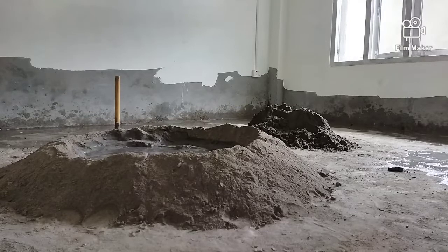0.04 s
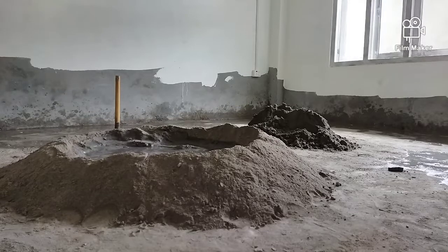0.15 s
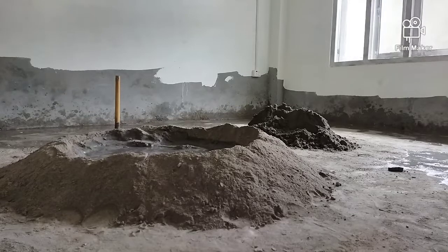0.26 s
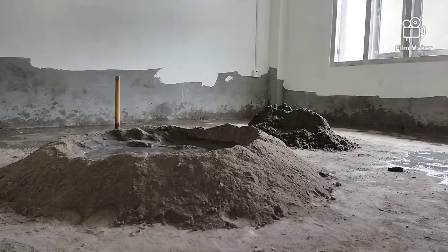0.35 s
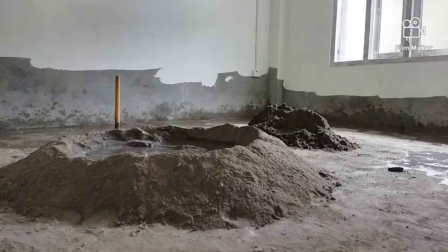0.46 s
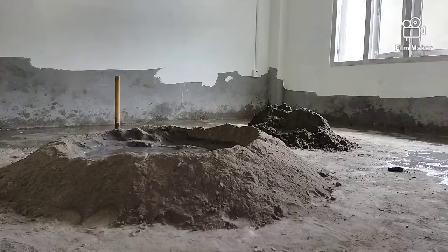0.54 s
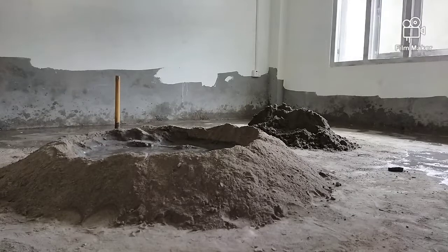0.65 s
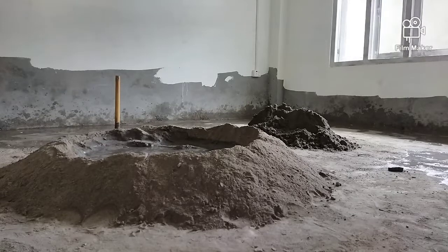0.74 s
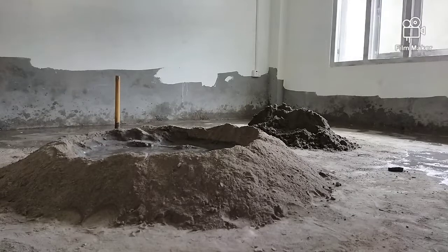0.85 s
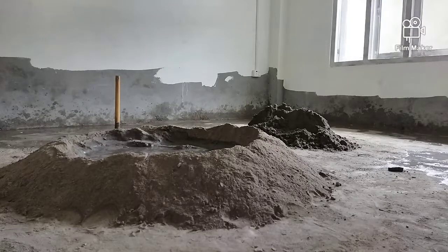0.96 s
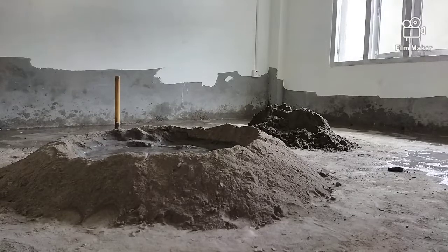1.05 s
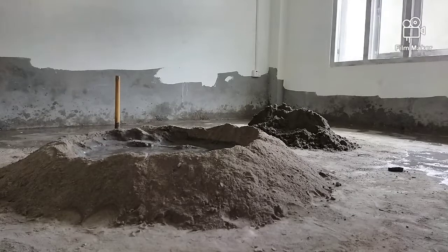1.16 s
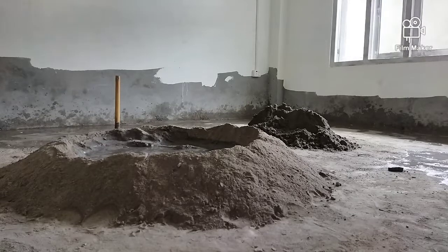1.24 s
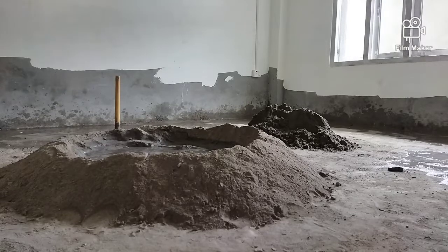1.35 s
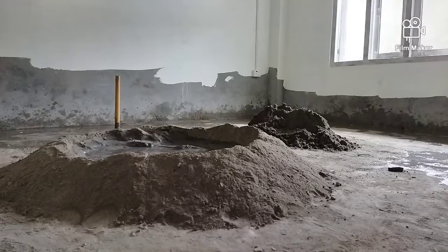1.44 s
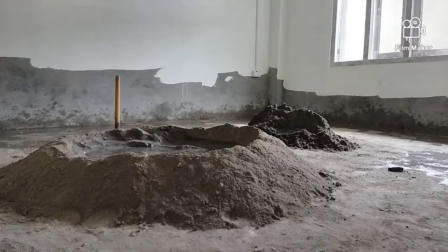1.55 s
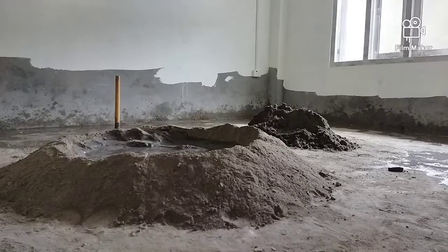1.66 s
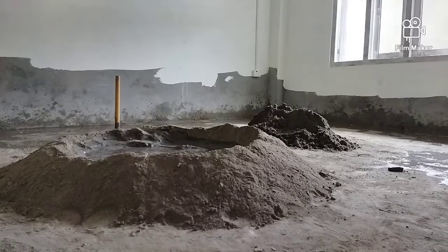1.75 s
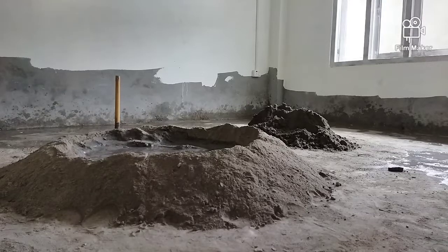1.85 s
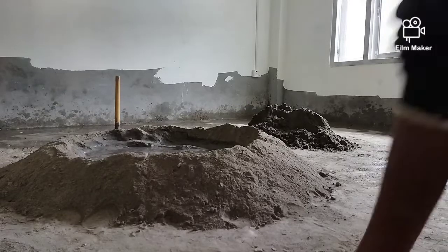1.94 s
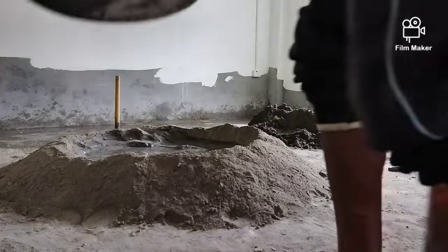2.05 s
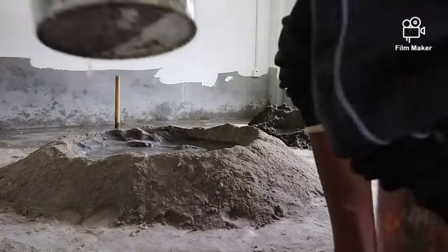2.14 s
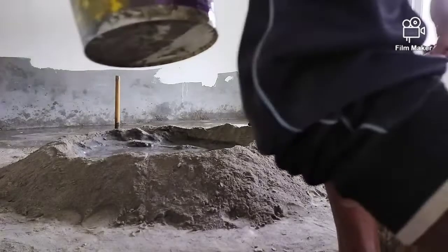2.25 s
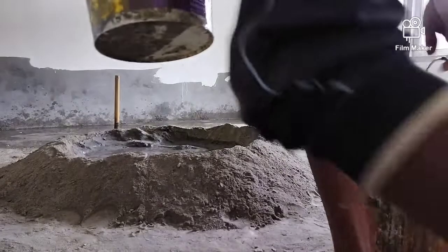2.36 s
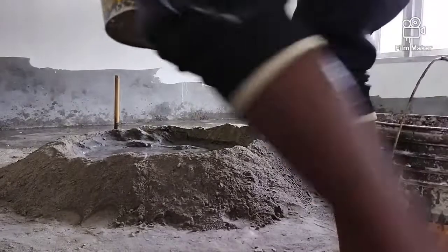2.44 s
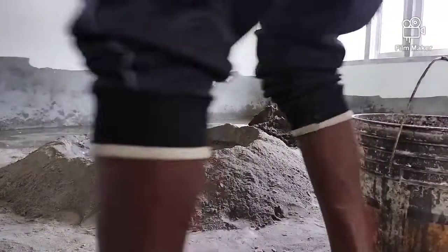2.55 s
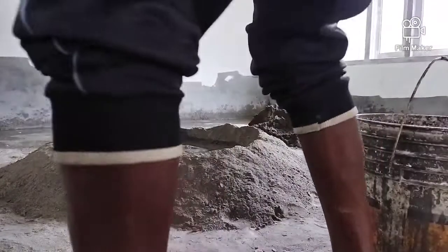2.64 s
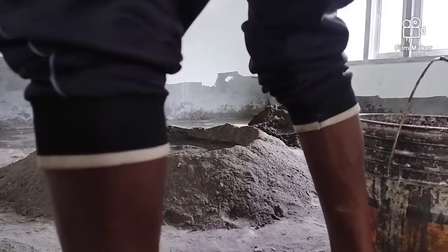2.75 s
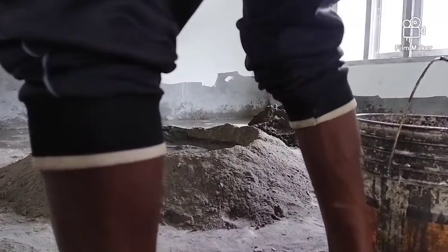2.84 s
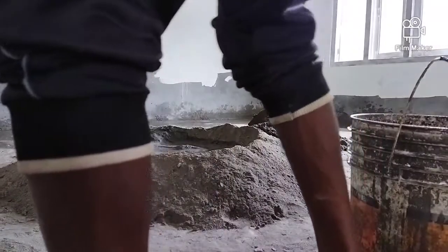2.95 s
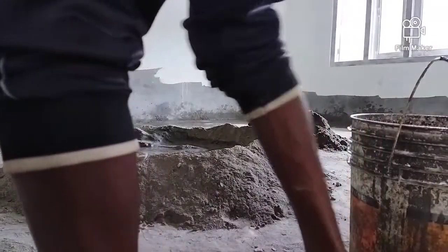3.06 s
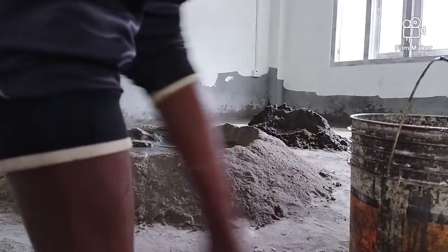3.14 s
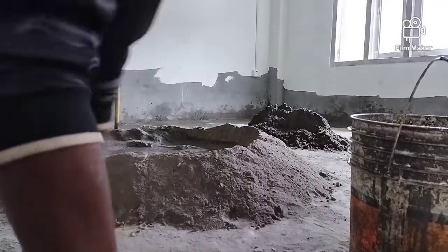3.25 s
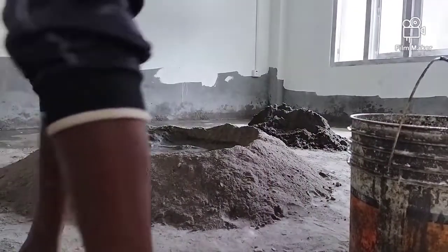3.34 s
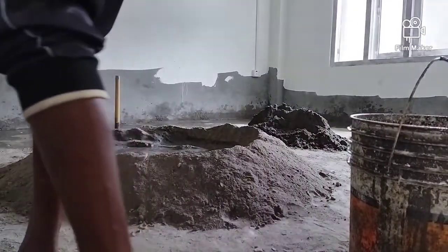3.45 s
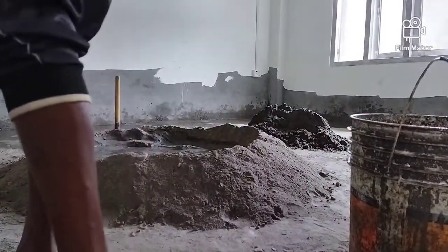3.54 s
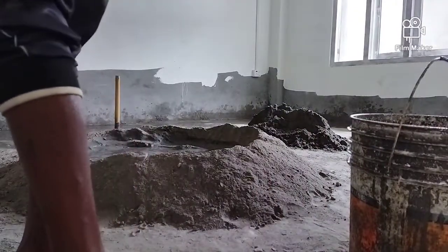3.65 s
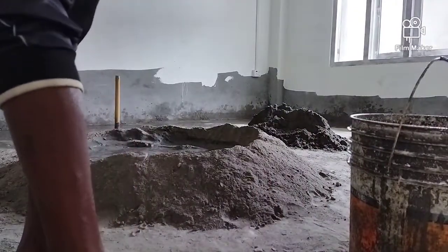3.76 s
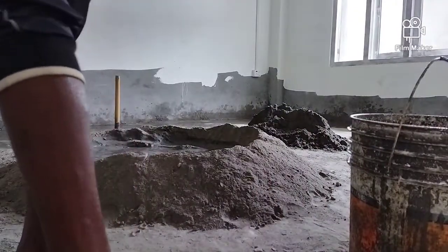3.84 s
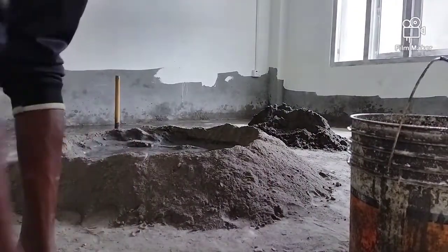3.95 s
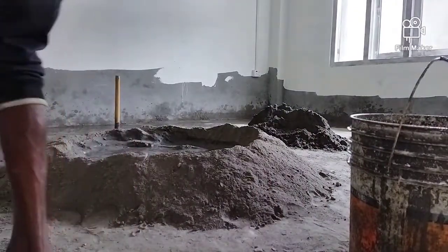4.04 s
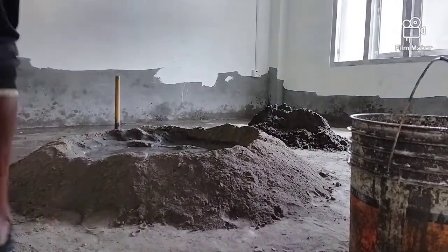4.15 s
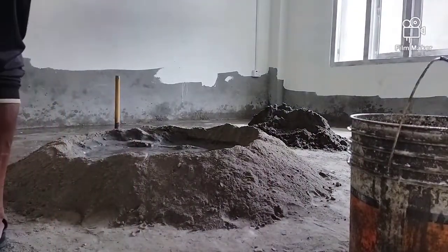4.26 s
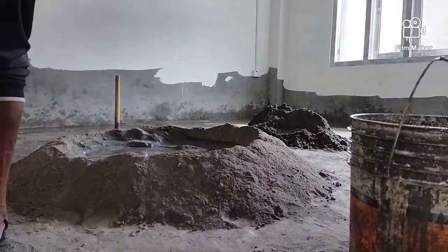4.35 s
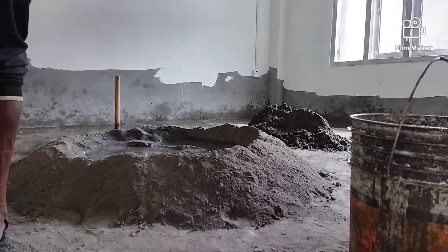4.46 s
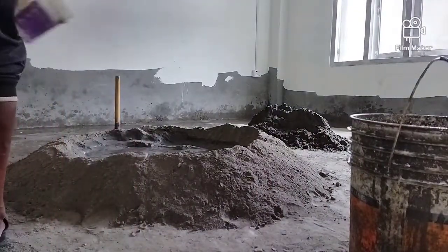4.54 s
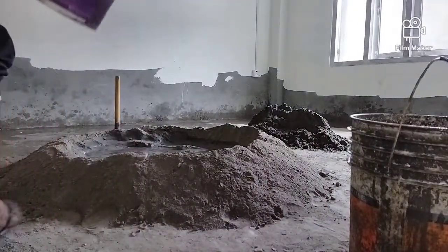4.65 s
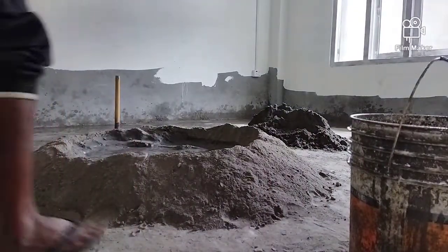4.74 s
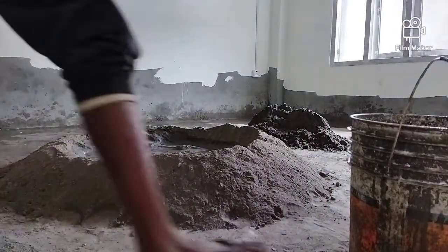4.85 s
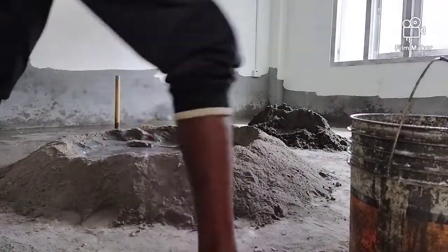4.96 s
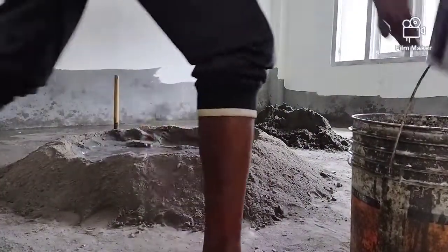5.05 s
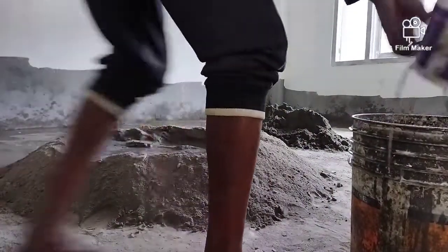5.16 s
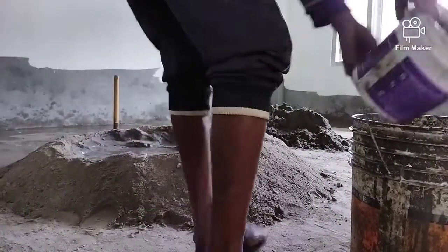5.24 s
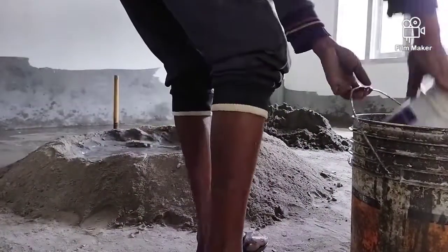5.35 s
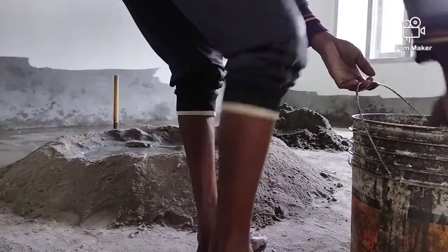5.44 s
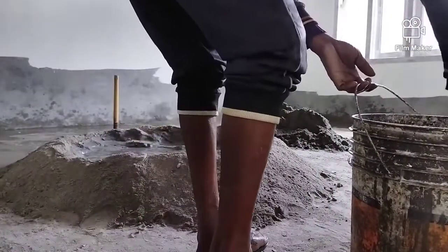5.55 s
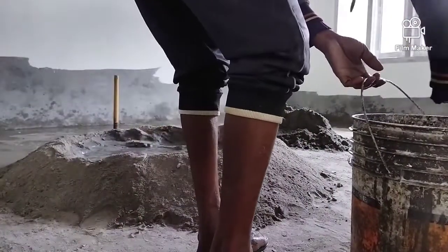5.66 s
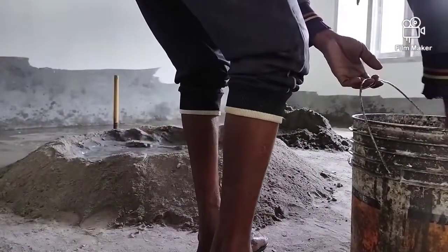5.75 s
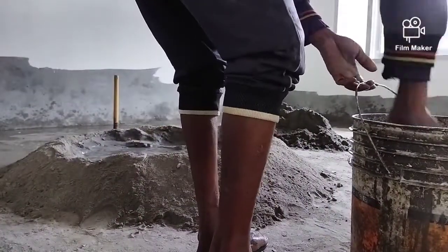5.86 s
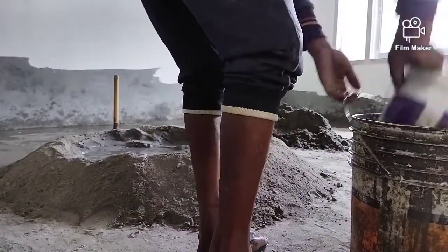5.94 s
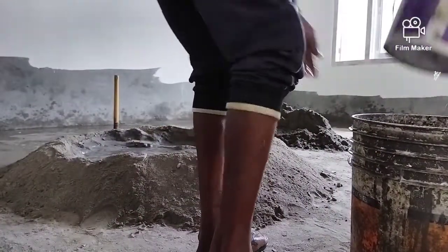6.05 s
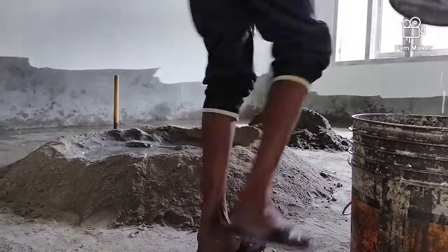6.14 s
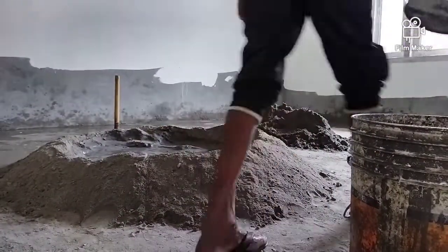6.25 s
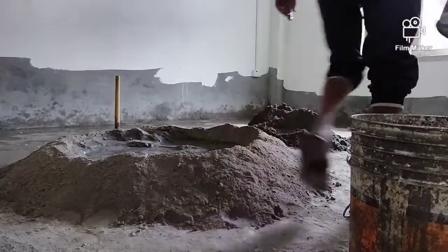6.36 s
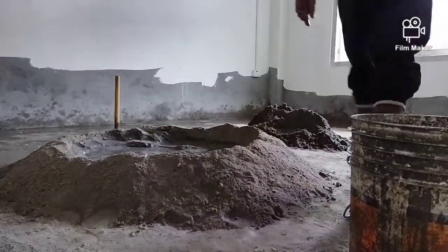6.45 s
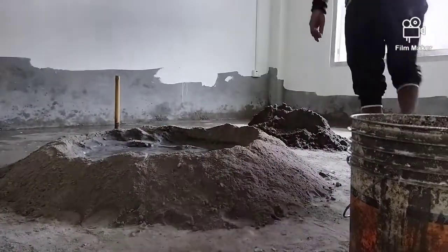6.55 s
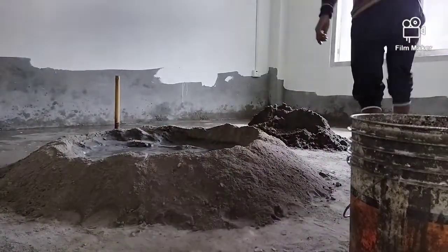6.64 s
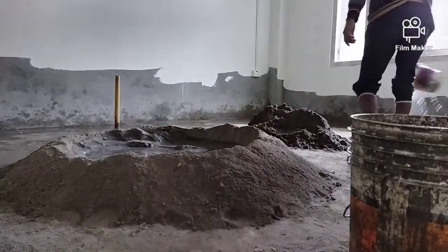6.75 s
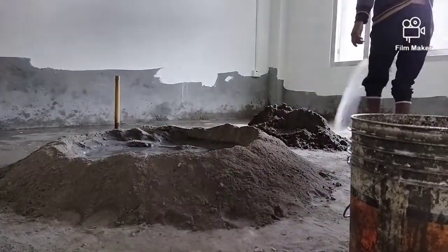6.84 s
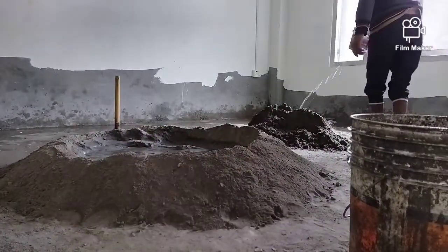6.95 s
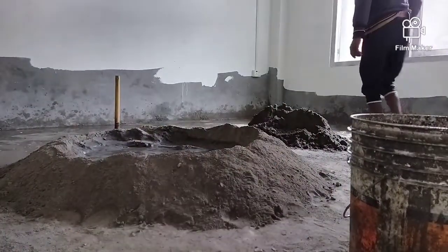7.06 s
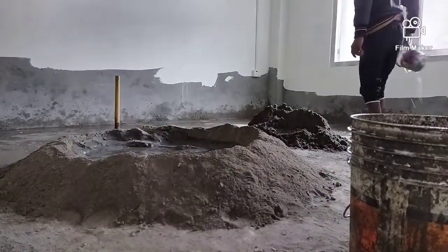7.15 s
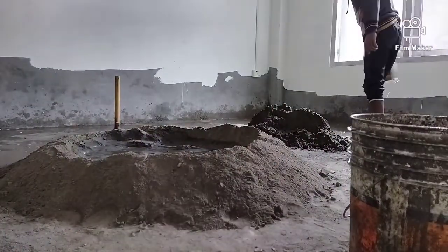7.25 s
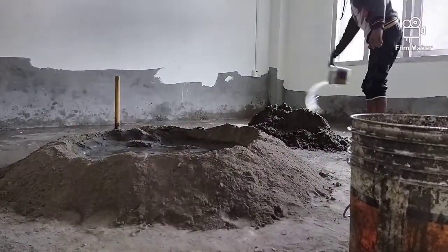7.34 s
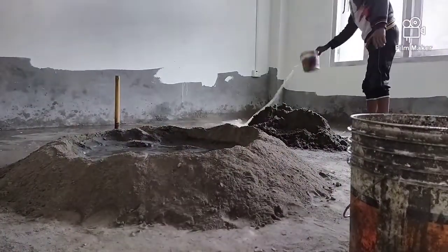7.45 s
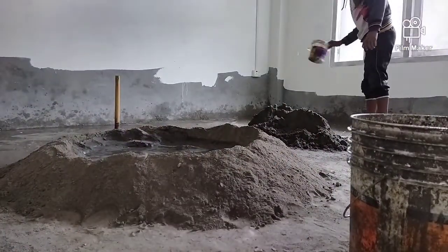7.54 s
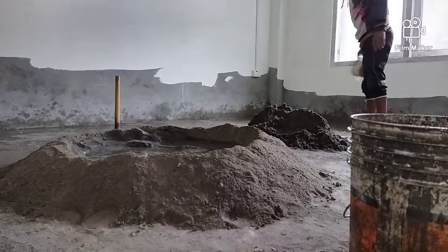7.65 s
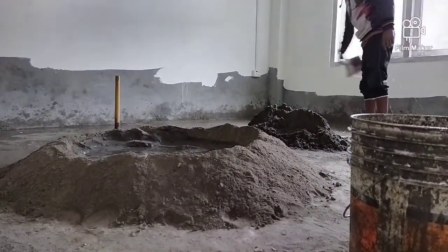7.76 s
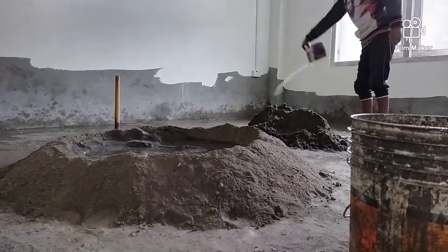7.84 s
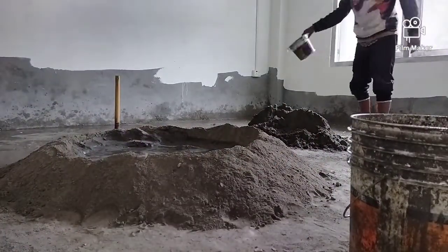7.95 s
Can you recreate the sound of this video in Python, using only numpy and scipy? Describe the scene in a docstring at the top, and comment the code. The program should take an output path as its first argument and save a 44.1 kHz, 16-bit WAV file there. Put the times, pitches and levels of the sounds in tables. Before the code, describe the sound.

In a hard-walled room, a metal can scoops water with clanks and bubbling gulps, each scoop followed by short splashes thrown onto sand.

```python
"""Even to-and-fro swishes open the scene in a bare concrete room; cloth rustles, sandals tap and grit ticks.
A can clanks in a bucket of water and gulps (ringing metal modes, air pockets), then three throws of water
land on sand as coloured showers of tiny impacts. A longer clanking, churning scoop and two more throws follow.
Decaying diffuse noise gives the hard walls' echoes, over a steady outdoor murmur of coloured noise;
a far-off motor hum comes up late, unevenly."""
import sys
import numpy as np
from scipy import signal
from scipy.fft import rfft, irfft, next_fast_len
from scipy.io import wavfile

SR = 44100
rng = np.random.default_rng(int(sys.argv[2]) if len(sys.argv) > 2 else 0)


def unload_wav(signal):
    """Save mono or channel-first audio to the path in sys.argv[1] as 16-bit WAV at rate SR, clipped to [-1, 1]."""
    wavfile.write(
        sys.argv[1],
        SR,
        np.round(np.clip(np.atleast_2d(signal).T, -1, 1) * 32767).astype(np.int16),
    )


N = 352664  # length in samples

# Blows of can against bucket. Each row: start in seconds, clank level in dB, contact brightness in Hz,
# level of the can's hollow in dB, its pitch in Hz, thud level of the bucket in dB.
BLOWS = [(2.386, -45.5, 3800, -41.5, 863, -38), (2.411, -52.5, 5500, -51, 890, -51),
         (2.4975, -48.5, 4800, -64, 900, -54), (2.5179, -46, 8950, -67, 845, -55),
         (5.2175, -31.5, 9900, -38, 894, -51), (5.243, -40, 3200, -49, 980, -50),
         (5.341, -44.5, 2400, -48, 770, -68), (5.3737, -46, 10000, -54, 975, -58),
         (5.442, -48, 3000, -51.5, 850, -52), (5.5293, -46.5, 4500, -39, 829, -53.5),
         (5.683, -51, 4600, -56, 735, -63), (6.055, -55, 7440, -68, 920, -72),
         (6.2176, -44, 3500, -57, 810, -63), (6.2217, -27, 4970, -34.5, 817, -45.5),
         (6.228, -25, 5470, -45, 830, -48), (6.2935, -34.5, 9500, -42.5, 883, -43)]
# Modes of the thin metal wall. Each row: frequency in Hz, mean level in dB.
WALL_MODES = [(1323, -7), (1548, -1.5), (1833, 0.5), (2011, -3.5), (2365, 9), (2465, 8), (2542, 2),
              (2733, -19), (3450, -8), (3850, 6), (4100, -1), (4590, 4.5), (5325, 7.5), (6250, 10.5)]
# Spectrum of the dense crowd of metal modes. Each row: frequency in Hz, level in dB.
CRASH_SPECTRUM = [(300, -62), (600, -11), (1000, 15.5), (1400, 7), (2400, 11), (4000, 15), (6500, 12),
                  (10000, 8), (14000, -13), (17000, -69)]
# Spectrum of the full bucket's dull thud. Each row: frequency in Hz, level in dB.
THUD_SPECTRUM = [(25, -25), (100, -25), (180, -30), (305, 2), (440, -7), (650, -1), (1100, -2), (2000, -39),
                 (5000, -50)]
# Wall ring relative to the crash at a hard blow; softer blows ring less.
RING_DB, RING_PER_DB, HARD_BLOW_DB = 1.5, 0.27, -28
# Lowest mode of the full bucket; its level is relative to the clank.
BODY_HZ, BODY_T60_S, BODY_DB = 306.6, 0.19, -30
# Snap relative to the clank; it grows with the brightness of the contact.
SNAP_DB, SNAP_DB_PER_OCT, SNAP_REF_HZ = -8.5, 4.5, 5050


def clanks(crash_t60=0.12, ring_t60=0.041, hollow_t60=0.025, thud_t60=0.047, snap_t60=0.025, port_turn=0.74):
    """Modal synthesis: each blow excites damped modes of the metal wall, the can's hollow and the heavy bucket."""
    out = np.zeros((2, N))
    t = np.arange(SR // 4) / SR
    # dents split every wall mode into a close pair; crusted cement damps them, the high ones most
    hz, mode_db = np.repeat(WALL_MODES, 2, axis=0).T[:, :, None]
    decay = fade(t, ring_t60 * np.sqrt(2000 / hz))
    # short waves reach the left and right with more unlike phases
    turn = port_turn * np.minimum(hz / 2500, 1.3)
    # the heavy, low parts take a moment to get moving
    swell = 1 - fade(t, .007)
    for s, wall_db, bright_hz, hollow_db, hollow_hz, thud_db in BLOWS:
        # the striking point sets how much each mode rings
        strike, detune, phase, port = rng.standard_normal((4, len(hz), 1))
        angle = 2 * np.pi * (hz * (1 + .008 * detune) * t + phase)
        envelopes = amp(mode_db + 2 * strike) * decay
        ring = np.array([(envelopes * np.sin(angle + side * turn * port)).sum(0) for side in (1, -1)])
        ring_db = RING_DB + RING_PER_DB * (wall_db - HARD_BLOW_DB)
        crash = colour(noise(len(t)), CRASH_SPECTRUM) * fade(t, crash_t60)
        wall = soften(burst(ring, ring_db) + burst(crash, 0), bright_hz)

        hollow = np.sin(2 * np.pi * hollow_hz * t) * fade(t, hollow_t60) * swell
        body = np.sin(2 * np.pi * BODY_HZ * t) * fade(t, BODY_T60_S) * swell
        thud = colour(noise(len(t)), THUD_SPECTRUM) * fade(t, thud_t60) * swell

        # the first touch of the edges is a bare snap
        snap_db = SNAP_DB + SNAP_DB_PER_OCT * np.log2(bright_hz / SNAP_REF_HZ)
        snap = soften(noise(len(t)) * fade(t, snap_t60), 2.3 * bright_hz, low_hz=1470)

        clank = burst(wall, wall_db) + burst(snap, wall_db + snap_db) + burst(body, wall_db + BODY_DB)
        add(out, s, clank + burst(hollow, hollow_db) + burst(thud, thud_db))
    return out


# Big gulps into the can and drips off it. Each row: start in seconds, level in dB, pitch in Hz, t60 in seconds.
GULPS_AND_DRIPS = [(2.388, -47, 683, .12), (2.390, -33.5, 893.6, .09), (2.405, -33.5, 870, .115),
                   (5.72, -53.5, 772, .15), (5.782, -43, 883, 0.025), (5.798, -42.5, 800, 0.1),
                   (5.838, -46.5, 605, .045), (5.838, -36.5, 890, .05), (5.840, -39, 1310, 0.12),
                   (5.861, -38, 924, .05), (5.877, -39, 876, 0.043), (5.957, -46, 934, .04),
                   (6.001, -49, 950, .044), (6.028, -58, 2880, .03), (6.107, -56, 1170, .053),
                   (6.155, -58, 1880, .04)]
# Water stirred by the can. Each row: time in seconds, churn level in dB, spray level in dB.
STIRRING = [(5.31, -56, -57.5), (5.42, -55.5, -55), (5.50, -62, -65.5), (5.565, -49.5, -52),
            (5.655, -77, -71), (5.805, -52.5, -49.5), (5.87, -47.5, -56), (5.99, -59, -63),
            (6.21, -65.5, -61.5)]
# Spectrum of the churn. Each row: frequency in Hz, level in dB.
CHURN_SPECTRUM = [(150, -40), (400, -23.5), (570, -4.5), (950, -4), (1350, -1), (1700, -11), (3000, -13),
                  (8000, -37)]
# Spectrum of the spray. Each row: frequency in Hz, level in dB.
SPRAY_SPECTRUM = [(800, -40), (2400, 6.5), (3500, 1.5), (4600, 5.5), (6000, 2), (12000, -3.5), (16000, -15)]
# Small bubbles; the level is that of the largest, relative to the churn.
BUBBLES_PER_S, BUBBLE_DB = 40, -1
BUBBLE_HZ, BUBBLE_SPREAD_OCT, BUBBLE_T60_S = 1002, .7, 0.085


def scoop():
    """Bubble resonance and impact noise: the can gulps, water churns around it and trickles off in fits."""
    out = np.zeros((2, N))
    churn_db, spray_db = gains(STIRRING)
    for s, db, hz, t60 in GULPS_AND_DRIPS:
        add(out, s, burst(bubble(hz, t60), db))
    lumps = drops(per_s=900, spread_db=3)
    trickle = drops(per_s=2000, spread_db=5) * amp(2.5 * wander(per_s=120))
    start, end = STIRRING[0][0], STIRRING[-1][0]
    for when, size, pitch in rng.random((int(BUBBLES_PER_S * (end - start)), 3)):
        s = start + when * (end - start)
        hz = BUBBLE_HZ * 2 ** (BUBBLE_SPREAD_OCT * (2 * pitch - 1))
        add(out, s, size * burst(bubble(hz, BUBBLE_T60_S), churn_db[int(s * SR)] + BUBBLE_DB))
    churn = amp(churn_db) * colour(lumps, CHURN_SPECTRUM)
    spray = amp(spray_db) * colour(trickle, SPRAY_SPECTRUM)
    return out + churn + spray


def bubble(hz, t60, glide=0.059, swell_s=0.0017):
    """Bubble resonance: an air pocket rings as a damped oscillator and rises a little in pitch."""
    t = np.arange(SR // 5) / SR
    tone = np.sin(2 * np.pi * hz * t * (1 + glide * t))
    return tone * fade(t, t60) * (1 - np.exp(-t / swell_s))


# Sheets of water landing. Each row: first drops in seconds, their level below the bulk in dB, bulk in seconds,
# its rise in seconds, its hold in seconds, sag between clumps in dB, then levels of fine hiss, patter, slap in dB.
# DROP_CLASSES adjusts the second, fifth and sixth columns.
WATER_SHEETS = [(3.505, 6.5, 3.594, 0.025, 0.041, 4.5, -42.5, -43, -41.5),
                (4.048, 14, 4.105, 0.0088, 0.03, 1, -46, -43.5, -50.5),
                (4.538, 2, 4.608, 0.038, 0.018, 0.5, -52, -64, -67),
                (6.931, 7.5, 7.046, 0.061, 0.028, 0, -47.5, -42.5, -48),
                (7.536, 4.5, 7.61, 0.023, 0.026, 0.5, -50, -44.5, -59)]
# Behaviour of hiss, patter and slap in turn. Each row: extra weakness of the first drops in dB,
# share of the hold, t60 of the fall in seconds, share of the sag.
DROP_CLASSES = [(-2.4, 1.64, .31, 0.86), (9.5, 0.93, .25, 0.55), (0.5, 0.23, 0.31, 2.8)]
# Spectrum of fine drops, which also colours brushes of cloth. Each row: frequency in Hz, level in dB.
HISS_SPECTRUM = [(200, -40), (1200, -21), (2500, -16.5), (5000, -.5), (7000, 0.5), (10000, 2), (14000, 0),
                 (16500, -27)]
# Spectrum of large drops. Each row: frequency in Hz, level in dB.
PATTER_SPECTRUM = [(1000, -32), (2300, -2.5), (3500, -1.5), (5500, 1), (7000, 0), (11000, -10)]
# Spectrum of the slapping bulk. Each row: frequency in Hz, level in dB.
SLAP_SPECTRUM = [(40, -42), (150, -28), (320, -3.5), (650, -0.5), (950, 2.5), (1800, 4.5), (2600, -4.5),
                 (5000, -6)]


def splashes(left_db=0.7):
    """Superposed random impacts: fine drops hiss first and longest, large ones patter, the bulk slaps."""
    hiss = drops(per_s=5500, spread_db=6)
    patter = drops(per_s=2500, spread_db=5)
    slap = drops(per_s=1400, spread_db=4)
    showers = (hiss, HISS_SPECTRUM), (patter, PATTER_SPECTRUM), (slap, SLAP_SPECTRUM)
    water = 0
    for k, (shower, spectrum) in enumerate(showers):
        weak_db, hold_share, fall_t60, sag_share = DROP_CLASSES[k]
        flow = 0
        for first_s, below_db, bulk_s, rise_s, hold_s, sag_db, *levels_db in WATER_SHEETS:
            sheet = landing(first_s, below_db + weak_db, bulk_s, rise_s,
                            sag_share * sag_db, hold_share * hold_s, fall_t60)
            flow = flow + amp(levels_db[k]) * sheet
        flicker = amp(1.4 * wander(per_s=110))
        water = water + flow * flicker * colour(shower, spectrum)
    return water * amp([[left_db], [-left_db]])


CLUMP_S = .049  # a sheet breaks into clumps that land this far apart
FIRST_DROPS_ATTACK = 0.39  # attack of the first drops as a share of the bulk's rise


def landing(first_s, below_db, bulk_s, rise_s, sag_db, hold_s, fall_t60):
    """Envelope of a sheet: first drops arrive, the bulk swells over them, holds and decays, clump by clump."""
    t = np.arange(N) / SR
    attack = np.clip((t - first_s) / (FIRST_DROPS_ATTACK * rise_s), 0, 1)
    bulk = np.exp(-(np.minimum(t - bulk_s, 0) / rise_s) ** 2)
    clumps = amp(-sag_db * ((t - bulk_s) / CLUMP_S % 1))
    fall = fade(np.maximum(t - bulk_s - hold_s, 0), fall_t60)
    return attack * np.maximum(amp(-below_db), bulk) * clumps * fall


# Grit cracking under sandals. Each row: start in seconds, level in dB.
GRIT_TICKS = [(2.345, -58.5), (2.6804, -52.5), (3.1025, -53.5), (3.151, -52.5), (3.3573, -56),
              (3.4185, -49.5), (3.4593, -49), (5.044, -59.5)]
GRIT_LOW_HZ, GRIT_HIGH_HZ = 3520, 13500
# Sandals tapping the floor. Each row: start in seconds, level in dB.
SANDAL_TAPS = [(1.887, -57.5), (2.109, -52.5), (4.262, -57.5)]
STEP_LOW_HZ, STEP_HIGH_HZ = 524, 2960
# Brushes of clothing. Each row: start in seconds, level in dB.
CLOTH_BRUSHES = [(2.109, -62), (2.35, -66), (3.16, -64), (3.379, -63), (3.431, -62), (4.33, -64.5),
                 (5.04, -60.5), (6.055, -61), (6.44, -64), (6.64, -62), (7.328, -65.5), (7.94, -66)]


def footwork(tick_t60=0.0091, step_t60=0.0083, brush_s=0.014):
    """Contact and friction noise: sharp ticks of grit, duller taps of sandals and soft brushes of cloth."""
    out = np.zeros((2, N))
    t = np.arange(SR // 5) / SR
    for s, db in GRIT_TICKS:
        tick = soften(noise(len(t)) * fade(t, tick_t60), GRIT_HIGH_HZ, low_hz=GRIT_LOW_HZ)
        add(out, s, burst(tick, db))
    for s, db in SANDAL_TAPS:
        tap = soften(noise(len(t)) * fade(t, step_t60), STEP_HIGH_HZ, low_hz=STEP_LOW_HZ)
        add(out, s, burst(tap, db))
    brush = t / brush_s * np.exp(1 - t / brush_s)  # peaks at 1 after brush_s
    for s, db in CLOTH_BRUSHES + swishes():
        add(out, s, amp(db) * colour(noise(len(t)), HISS_SPECTRUM) * brush)
    return out


# Faint swishes, strong and weak in turn, that slowly grow.
SWISH_FIRST_S, SWISH_EVERY_S = .333, .191
SWISH_DB, SWISH_WEAK_DB, SWISH_GROWTH_DB_PER_S = -63.5, -2.5, 3.5


def swishes(count=9):
    """Periodic motion: rows (s, dB) of an even to-and-fro swishing."""
    k = np.arange(count)
    elapsed = k * SWISH_EVERY_S
    levels_db = SWISH_DB + SWISH_WEAK_DB * (k % 2) + SWISH_GROWTH_DB_PER_S * elapsed
    return list(zip(SWISH_FIRST_S + elapsed, levels_db))


# Reverberation of the room. Each row: frequency in Hz, t60 in seconds.
REVERB_T60 = [(100, 0.37), (330, 0.63), (800, 0.54), (1500, 0.41), (2700, 0.41), (5500, 0.35),
              (11000, 0.32), (16000, 0.48)]


def room(first_s=0.0043, build_s=0.0011):
    """Diffuse reverberation: dense echoes of bare walls, each band decaying at its own t60; unit energy."""
    t = np.arange(SR) / SR
    f, s, frames = signal.stft(noise(len(t)), SR, nperseg=256)
    frames = frames * fade(s, at_hz(REVERB_T60, f)[:, None])
    tail = signal.istft(frames, SR)[1][:, :len(t)]
    tail = tail * (1 - np.exp(-np.maximum(t - first_s, 0) / build_s))
    return tail / np.sqrt(np.sum(tail ** 2) / 2)


# Spectrum of the outdoor murmur. Each row: frequency in Hz, density in dB per Hz before scaling to AIR_DB.
MURMUR_SPECTRUM = [(15, -68), (25, -55), (102, -22), (317, -2.5), (416, -0.5), (451, -1.5), (591, -3),
                   (1260, -1), (1400, -3), (2220, -4.5), (4140, -6), (9070, -12), (10400, -13),
                   (14400, -16), (16000, -21.5)]
AIR_DB = -63.5
# Level of a far-off motor hum. Each row: time in seconds, level in dB.
HUM_LEVEL = [(0, -103), (6.4, -77), (7.2, -80.5), (7.7, -70), (8, -74)]
# Lines of that hum. Each row: frequency in Hz, relative level in dB.
HUM_PEAKS = [(269, 0.5), (334, 2.5)]


def outdoors(waver_db=-0.15, hum_width_hz=13):
    """Filtered noise: a steady murmur through the windows, with a motor's narrow bands that come up late."""
    waver = wander(per_s=5)
    murmur = colour(noise(N), MURMUR_SPECTRUM) * amp(AIR_DB + waver_db * waver)
    f = np.arange(N // 2 + 1) * SR / N
    lines = sum(amp(db) / (1 + ((f - hz) / hum_width_hz) ** 2) for hz, db in HUM_PEAKS)
    hum = irfft(rfft(rng.standard_normal(N)) * lines, N)
    return murmur + hum / hum.std() * amp(gains(HUM_LEVEL))


def drops(per_s, spread_db):
    """Random point process: a shower of tiny impacts of uneven size."""
    sizes = amp(spread_db * np.minimum(rng.standard_normal((2, N)), 2))
    signs = rng.choice([-1, 1], (2, N))
    hits = rng.random((2, N)) < per_s / SR
    return diffuse(sizes * signs * hits)


def wander(per_s):
    """Random modulation: random levels joined by straight lines; spread near 1."""
    steps = np.arange(N) / SR * per_s
    knots = int(steps[-1]) + 2
    return np.interp(steps, np.arange(knots), rng.standard_normal(knots))


# Diffuse sound at left and right. Each row: frequency in Hz, side minus mid in dB.
STEREO_WIDTH = [(40, -10), (150, -17), (500, -10), (1000, -10.5), (2000, -2.5), (4000, 3), (16000, -2.5)]


def diffuse(pair):
    """Interchannel coherence: two unrelated signals become left and right, alike in the bass."""
    size = next_fast_len(pair.shape[-1])
    ratio = amp(at_hz(STEREO_WIDTH, np.arange(size // 2 + 1) * SR / size))
    mid, side = rfft(pair, size) / np.sqrt(1 + ratio ** 2)
    return irfft(np.array([mid + ratio * side, mid - ratio * side]), size)[:, :pair.shape[-1]]


def noise(size):
    """Diffuse field: stereo Gaussian noise."""
    return diffuse(rng.standard_normal((2, size)))


def colour(x, points):
    """Spectral shaping: filter a sound by (Hz, dB) points; rms 1."""
    size = next_fast_len(x.shape[-1])
    gain = amp(at_hz(points, np.arange(size // 2 + 1) * SR / size))
    y = irfft(rfft(x, size) * gain, size)[..., :x.shape[-1]]
    return y / np.sqrt(np.mean(y ** 2))


def soften(x, hz, low_hz=450):
    """Contact filtering: a small contact radiates no bass, and a softer one no treble."""
    band = [low_hz, min(hz, SR / 2 - 2000)]
    return signal.sosfilt(signal.butter(2, band, "bandpass", fs=SR, output="sos"), x)


def fade(t, t60):
    """Exponential decay: 60 dB lost in t60 seconds."""
    return np.exp(-np.log(1000) * t / t60)


def burst(x, db):
    """Energy scaling: give a short sound the energy of 10 ms at the given level."""
    return x * amp(db) / np.sqrt(np.mean(x ** 2) * x.shape[-1] / SR * 100)


def gains(rows):
    """Level interpolation: curves in dB from rows (s, dB, ..); silent outside them."""
    s, *columns = np.transpose(rows)
    t = np.arange(N) / SR
    return np.array([np.interp(t, s, c, left=-np.inf, right=-np.inf) for c in columns])


def at_hz(points, hz):
    """Logarithmic frequency: read (Hz, value) points on a log-frequency axis."""
    f, v = np.transpose(points)
    return np.interp(np.log(np.maximum(hz, 1)), np.log(f), v)


def amp(db):
    """Decibel law: level to amplitude gain."""
    return 10 ** (np.asarray(db) / 20)


def add(out, s, x):
    """Superposition: mix a sound in at time s."""
    i = int(s * SR)
    out[:, i:i + x.shape[-1]] += x[..., :N - i]


def scene():
    """Direct and reverberant sound: the indoor sources are also heard through the room; the murmur is not."""
    metal, water, thrown, steps = clanks(), scoop(), splashes(), footwork()
    send = amp(-4.0) * metal + amp(-6.5) * water + amp(-5.5) * thrown + amp(-4) * steps
    echoes = signal.fftconvolve(send, room(), axes=1)[:, :N]
    return metal + water + thrown + steps + echoes + outdoors()


TOP_HZ = 16000


def record(dry):
    """Band limiting: a steep low-pass removes the treble above TOP_HZ."""
    return signal.sosfilt(signal.ellip(10, .1, 80, TOP_HZ, fs=SR, output="sos"), dry)


dry = scene()
out = record(dry)
unload_wav(out)
```